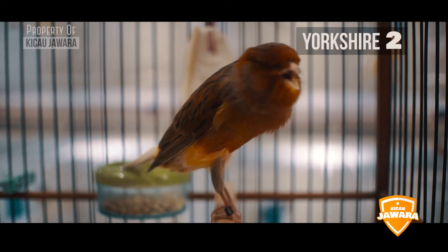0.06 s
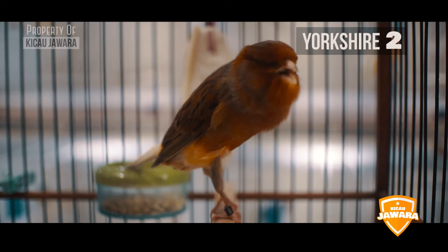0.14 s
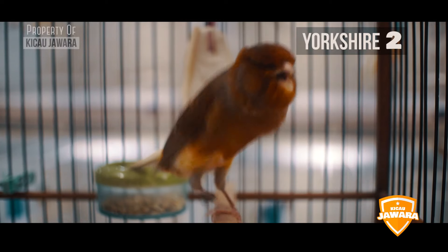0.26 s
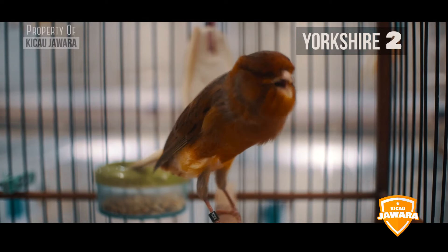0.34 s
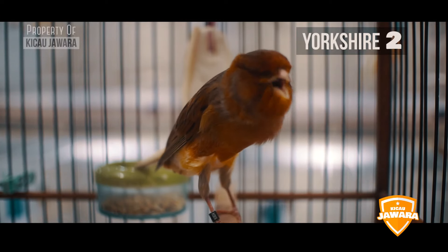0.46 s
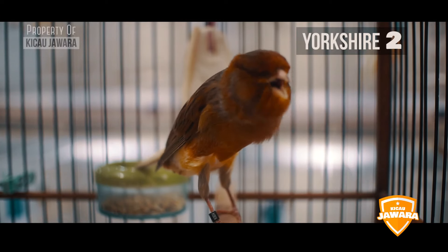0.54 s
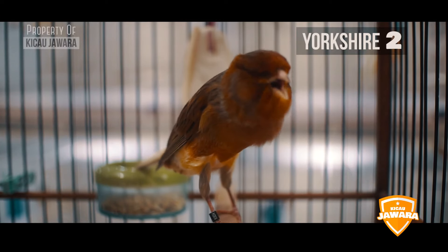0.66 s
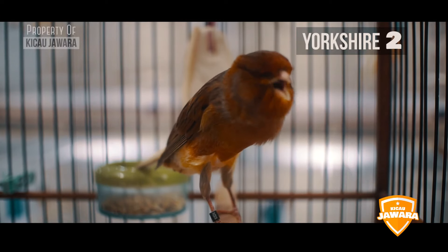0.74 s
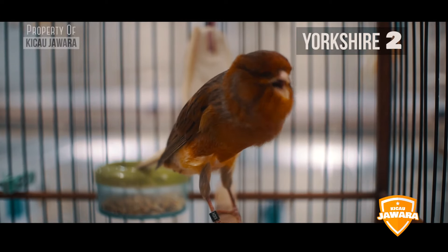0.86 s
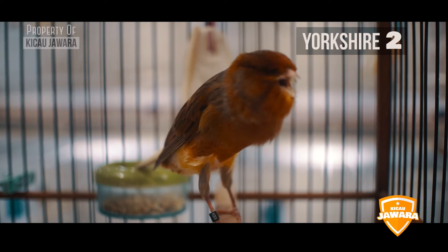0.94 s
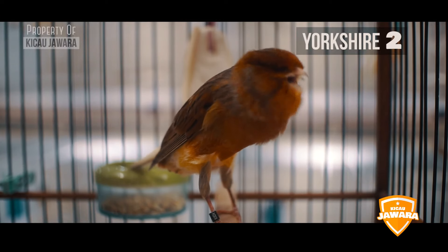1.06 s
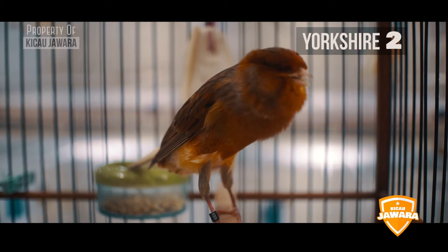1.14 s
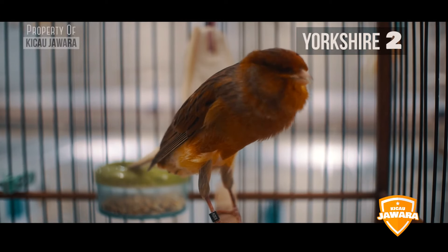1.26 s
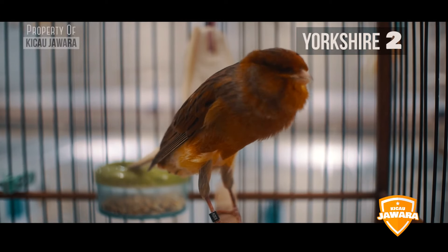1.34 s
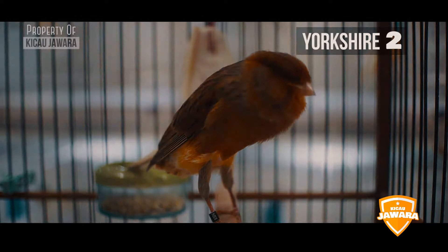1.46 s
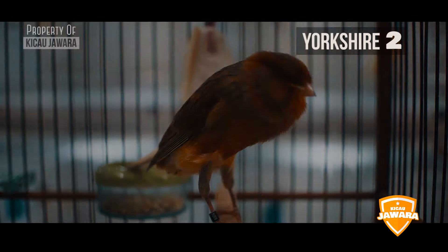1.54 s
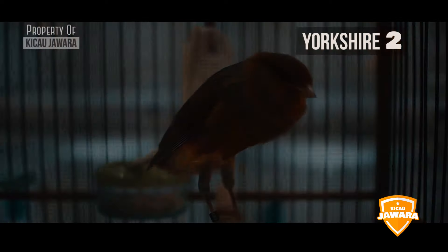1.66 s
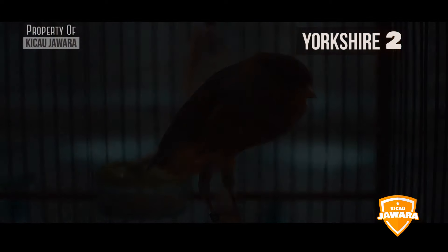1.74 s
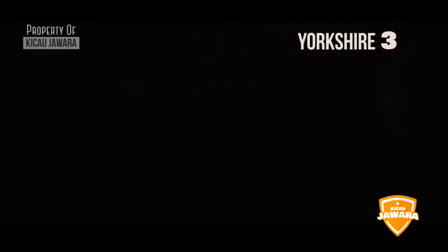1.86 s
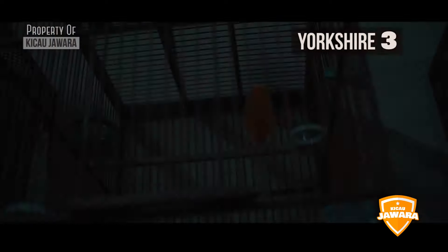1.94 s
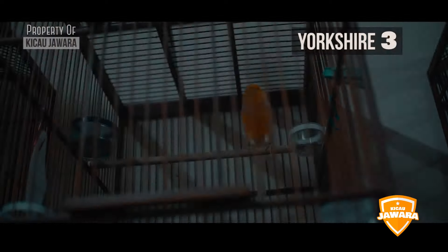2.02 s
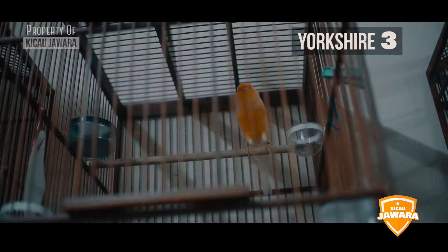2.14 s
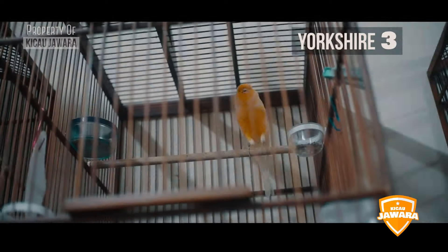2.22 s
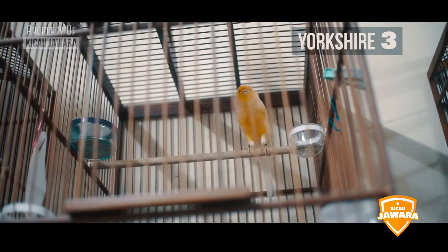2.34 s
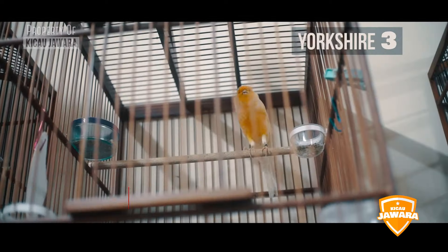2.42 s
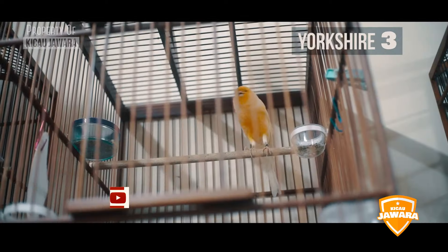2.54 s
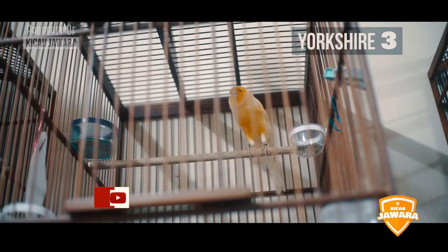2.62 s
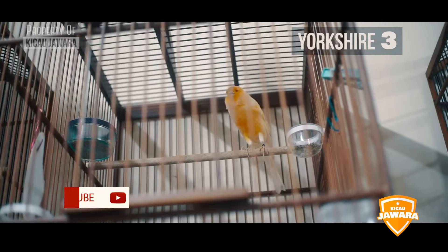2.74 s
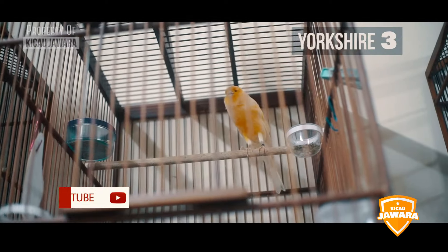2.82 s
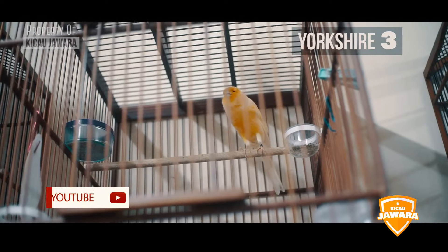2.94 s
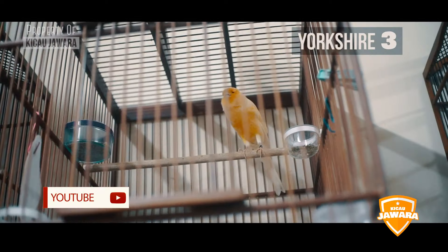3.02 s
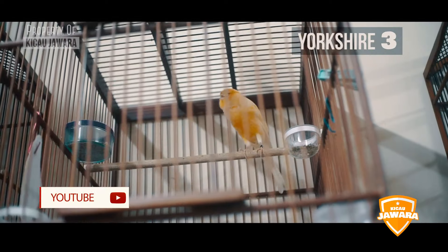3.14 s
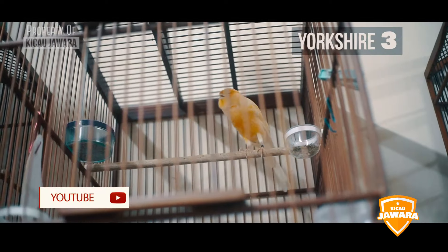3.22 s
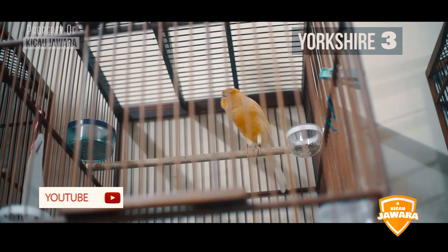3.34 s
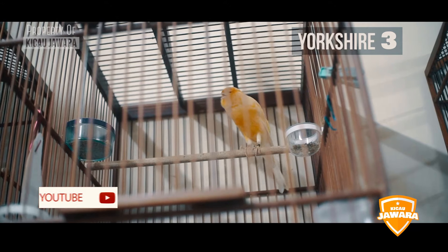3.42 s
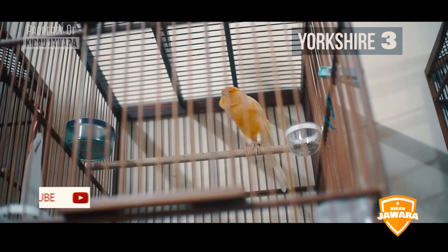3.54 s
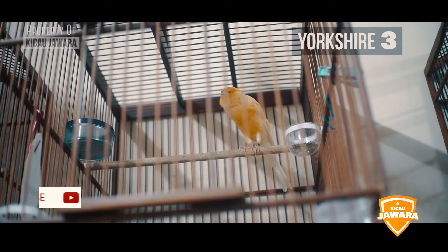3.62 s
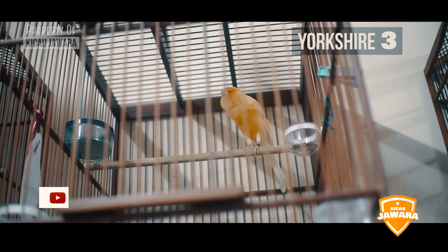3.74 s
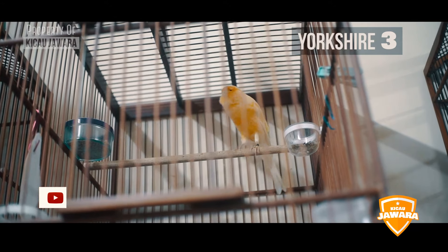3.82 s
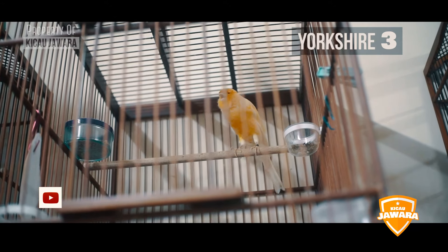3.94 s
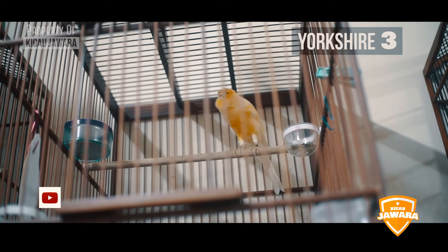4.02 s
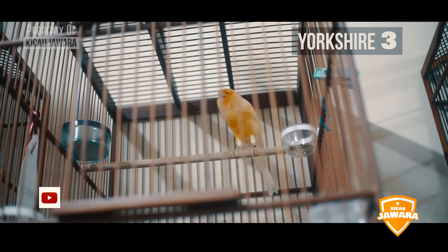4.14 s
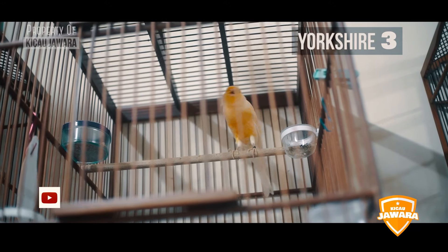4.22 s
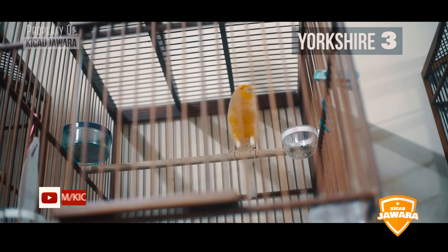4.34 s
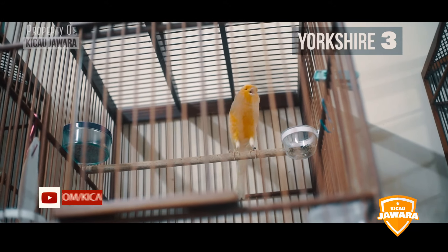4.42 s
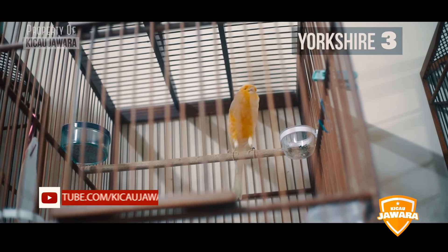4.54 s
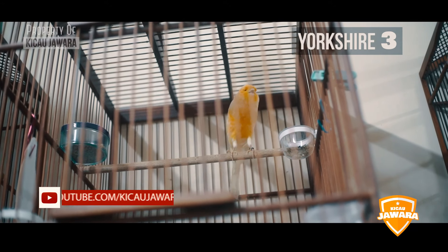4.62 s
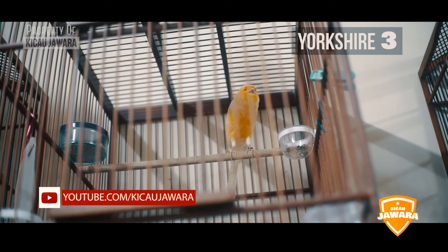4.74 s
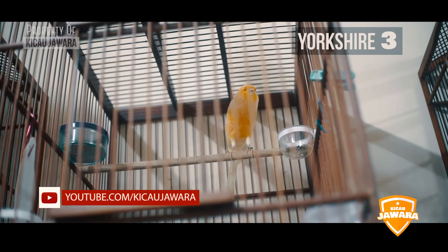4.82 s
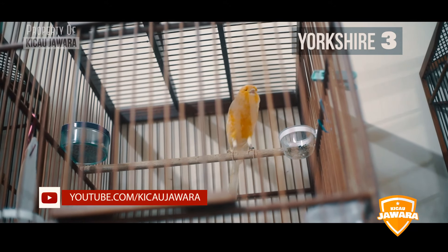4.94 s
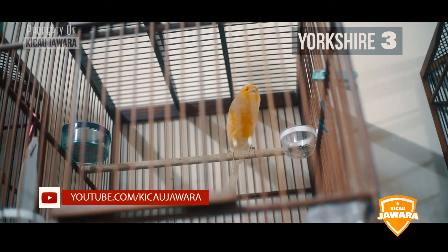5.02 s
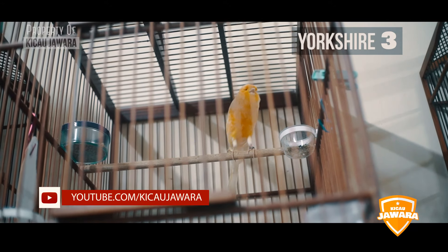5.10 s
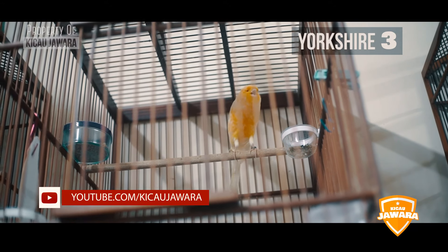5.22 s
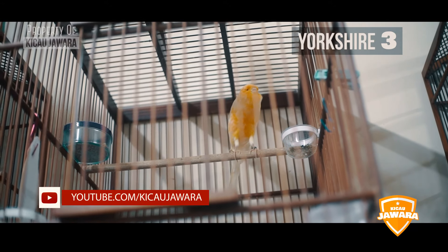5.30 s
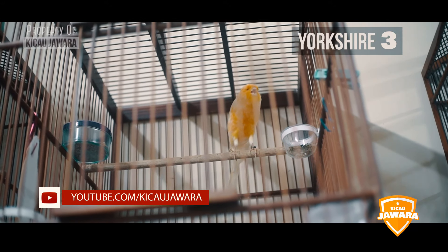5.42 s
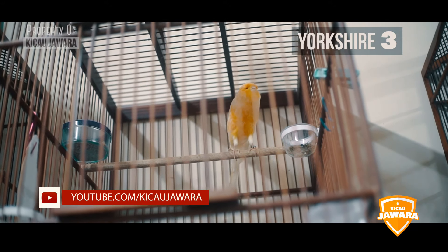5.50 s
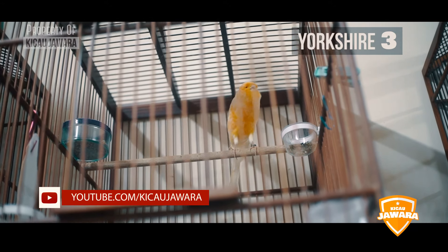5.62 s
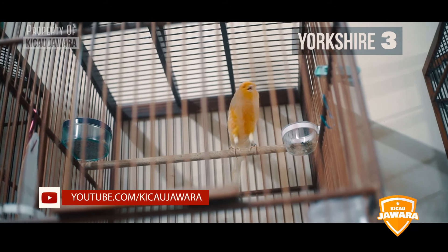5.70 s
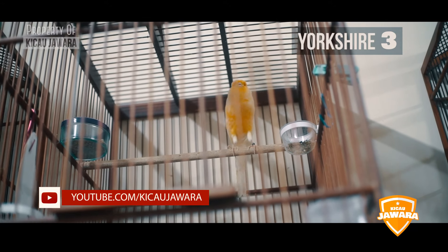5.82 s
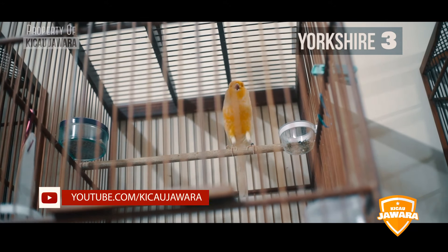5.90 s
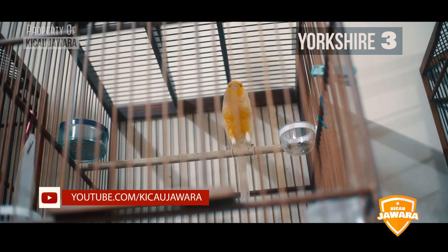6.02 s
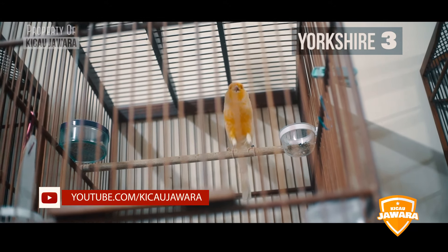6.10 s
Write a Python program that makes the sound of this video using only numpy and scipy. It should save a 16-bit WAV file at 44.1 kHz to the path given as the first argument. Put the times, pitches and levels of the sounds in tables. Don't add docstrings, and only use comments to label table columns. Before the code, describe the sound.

Indoor canary song: an even trill of piercing down-swept whistles, a short gap with distant birds, then rapid trilling, slow slides and bent slides.

```python
import sys
import numpy as np
from scipy import signal
from scipy.fft import rfft, irfft
from scipy.io import wavfile
from scipy.ndimage import uniform_filter1d, minimum_filter1d

SR = 44100
rng = np.random.default_rng(int(sys.argv[2]) if len(sys.argv) > 2 else 0)


def magnitude_from_level(level_db):
    exponent = np.asarray(level_db, float) / 20
    return 10 ** exponent


def log_audio(samples):
    frames = np.atleast_2d(samples).T
    limited = np.clip(frames, -1, 1)
    pcm = np.round(limited * 32767).astype(np.int16)
    wavfile.write(sys.argv[1], SR, pcm)


N = 271656

# f/Hz, level/dB (per Hz)
RUMBLE_SPECTRUM = [(14, -11), (25, 2), (39, -7), (53, 5), (66, -0.5), (87, -16.5), (121, -4.5),
                   (200, -26.5)]
AIR_SPECTRUM = [(88, -40), (150, -3.5), (640, -14), (1520, -15.5), (1900, -22), (2770, -16), (3740, -14.5),
                (5820, -10), (6500, -38), (8450, -74), (14300, -120)]
HISS_SPECTRUM = [(6000, -8), (6800, 0), (10000, -1), (13000, -1), (15900, -4)]
# t/s, level/dB
RUMBLE_LEVEL = [(0, -52.5), (.6, -50.5), (1.3, -47.5), (2.15, -35.5), (2.9, -41), (3.6, -42), (4.7, -46.5),
                (5.05, -46.5), (5.5, -42), (6.16, -41.5)]
# t/s, level/dB
AIR_STIR = [(.8, 0.5), (2.62, 7), (2.85, 1)]
# f/Hz, level/dB
WHINE_TONES = [(9712, 0), (12950, 0)]
# t/s, peak level/dB
WHINE_LEVEL = [(0, -59), (2.1, -49.5), (2.5, -71), (6.16, -60)]
# start t/s, length t/s, first f/Hz, last f/Hz, peak level/dB
DISTANT_NOTES = [(1.32, .22, 5900, 5830, -50), (1.41, .08, 3200, 3220, -48), (1.448, .087, 3500, 4700, -36),
                 (1.48, .12, 5000, 6050, -47), (1.665, .055, 4100, 4700, -42),
                 (1.685, .16, 4700, 6000, -42), (1.52, .2, 2620, 2530, -49), (1.515, .02, 2000, 2040, -47),
                 (1.62, .025, 1930, 2000, -48), (1.925, .11, 4250, 4330, -39), (3.21, .03, 2060, 1950, -51),
                 (3.425, .025, 2290, 2180, -48), (1.9, .05, 6400, 6250, -45), (1.93, .19, 2780, 2790, -44),
                 (1.93, .17, 2155, 2150, -52), (2.81, .06, 2170, 1890, -52), (3.16, .025, 2250, 2200, -50)]
# start t/s, length t/s, peak level/dB
FAR_NOTES = [(1.53, 0.11, -32.5), (1.715, 0.14, -28), (1.93, .125, -23), (2.145, 0.14, -24.5)]
# share of length, f/Hz, level/dB
FAR_ARCH = [(0, 3150, -5), (.23, 3255, 0), (.6, 3325, -.5), (.88, 3230, -4), (1, 3170, -12)]
# start t/s, length t/s, first f/Hz, last f/Hz, peak level/dB
THROBS = [
    (4.135, .12, 3400, 4040, -16),
    (4.228, .36, 3730, 3600, -19),
]
# t/s, peak level/dB
FLAPS = [
    (2.342, -37),
    (2.497, -30.5),
    (2.543, -31.5),
    (2.599, -38),
    (2.643, -37),
    (2.709, -44),
]
# start t/s, length to the knee t/s, top shift f/Hz, middle shift f/Hz, level/dB
TRILL = [(.2335, .0643, 97, 255, 0), (.3322, .0579, -8, -30, .1), (.423, .0589, -10, 30, .3),
         (.5168, .0569, -53, -28, 0), (.6096, .0599, 20, 100, -.5), (.7044, .0564, 9, 155, 0),
         (.7992, .0584, -20, 55, -.2), (.894, .0558, -28, -37, .2), (.9888, .0613, -114, -122, -.5)]
TRILL_ENDS = [
    (.1167, .0624, 122, 340, .2),
    (1.0945, .0544, -148, -340, -.2),
]
FAST_TRILL = [(2.1052, .0379, -281, 155, -5.6), (2.184, .0409, 2, 265, -2.6), (2.2718, .0389, -79, 75, -.5),
              (2.3556, .0365, 4, 115, 0), (2.4385, .0379, -13, 30, .2), (2.5213, .0379, -5, 38, .7),
              (2.6061, .0389, 3, 68, 0), (2.6909, .0394, 80, 28, .2), (2.7777, .0389, 57, -2, .7),
              (2.8655, .0399, 49, -75, .7), (2.9503, .0399, 36, -14, .3), (3.0371, .0399, 3, -27, -.3),
              (3.1289, .0414, -59, -210, .5), (3.2167, .0419, 59, -37, -.6), (3.3075, .0409, -2, -60, -.5),
              (3.4003, .0434, 13, -88, -.6)]
FIRST_SLIDE = [
    (3.498, .147, 0, 0, 0),
]
SLIDES = [(3.7195, .1596, 72, 56, .5), (3.955, .1611, 109, 60, .2), (4.1915, .1736, 83, -98, 0),
          (4.4469, .1786, -80, -130, -.7), (4.7103, .1325, -24, 175, -2.2), (4.9178, .1245, -21, 160, -1.8)]
BENT_SLIDES = [(5.1144, .0973, 4, 8, -1.1), (5.277, .0968, 50, 30, .2), (5.4476, .0968, -38, -20, -.3),
               (5.6192, .0918, -19, -63, -.2), (5.7829, .0967, -22, -4, .3), (5.9545, .0982, 53, 4, .9),
               (6.126, .097, 22, -8, .5)]
# share of length, f/Hz
TRILL_SHAPE = [(0, 6800), (.1, 6860), (.33, 6130), (.67, 4850), (1, 3500), (1.14, 2700)]
ENDS_SHAPE = [(0, 6800), (.1, 6800), (.33, 6150), (.67, 5030), (.9, 4200), (1, 4000), (1.13, 3800)]
FAST_SHAPE = [(0, 6080), (.12, 6060), (.33, 5440), (.67, 4570), (.92, 4060), (1, 3800), (1.12, 3100)]
FIRST_SHAPE = [(0, 6420), (.08, 6250), (.13, 5900), (.29, 5820), (.56, 5050), (.83, 3900), (.97, 3350),
               (1, 3000), (1.055, 900)]
SLIDE_SHAPE = [(0, 6520), (.07, 6520), (.33, 5770), (.67, 4690), (.955, 3640), (1.02, 3200), (1.065, 900)]
BENT_SHAPE = [(0, 6370), (.17, 6040), (.42, 4960), (.54, 4080), (.75, 3650), (.92, 3100), (1, 2700),
              (1.145, 500)]
# f/Hz, peak level/dB
TRILL_THROAT = [(2700, -68), (3200, -29.5), (3600, -14.5), (4000, -5.5), (4600, -3.5), (5100, -6),
                (5500, -13.5), (5900, -25), (6300, -11.5), (6700, -13), (7000, -9.5)]
FAST_THROAT = [(3100, -19), (3700, -10.5), (4150, -5.5), (4500, -8.5), (5200, -17.5), (5700, -15.5),
               (6000, -12), (6200, -16.5)]
SLIDE_THROAT = [(1150, -21.5), (1600, -29), (2400, -24.5), (3200, -8), (3700, -8), (4300, -5), (5000, -11),
                (5600, -13), (6000, -7.5), (6300, -14.5), (6600, -8)]
BENT_THROAT = [(900, -40), (1800, -25.5), (2600, -11.5), (3100, -9), (3700, -6.5), (4100, -14.5),
               (4700, -8), (5400, -16.5), (5900, -14.5), (6300, -8.5)]
# t/s, f/Hz, peak level/dB
NEAR_NOTES = [
    [(0, 4640, 4), (.02, 3950, -6.5), (.035, 3520, -13), (.041, 3250, -19), (.052, 2844, -10.5),
     (.057, 2660, -20), (.063, 1296, -34)],
    [(1.16, 3450, -56), (1.168, 3195, -21.5), (1.176, 2670, -10.5), (1.182, 2000, -33), (1.189, 1320, -26)],
]
LIVE_NOTES = [
    [(2.042, 4830, -39), (2.048, 4490, -13), (2.056, 3700, -24)],
]

AIR_DB, AIR_FOLLOWS = -50.5, 0.23
HISS_FIRST_DB, HISS_SECOND_DB, CHANGE_S = -66, -51, (0.8, 2.12)
MAINS_HZ, WHINE_START_S = 50, .0085
GLIDE_SHARE, DISTANT_FADE_DB = .15, 9
THROB_HZ, THROB_PEAK_S, THROB_DB, EVERY_OTHER_DB, THROB_FADE_DB = 26.7, 4.242, 8, 3, 8
THIRD_FADES_HZ, THIRD_FADE_DB_PER_KHZ = 4870, 8
DROP_DB, DROP_TIRES_DB_PER_S = 7, 7
STARVED_HZ, MASKER_HZ, BINS_PER_BAND = 6890, 4400, 14
MASK_DB = 47


def rms_one(x):
    return x / np.sqrt(np.mean(x ** 2) + 1e-20)


def at_hz(points, hz):
    curve_hz, curve_db = np.array(points)[:, 0], np.array(points)[:, 1]
    return np.interp(np.log(hz), np.log(curve_hz), curve_db)


def drift(rate, size):
    r = np.exp(-2 * np.pi * rate / SR)
    wander = signal.lfilter([1], [1, -2 * r, r * r], rng.standard_normal(size + 4000))
    return rms_one(wander[4000:])


def noise(spectrum, side_db):
    hz = np.fft.rfftfreq(N, 1 / SR) + 1e-3
    colour = magnitude_from_level(at_hz(spectrum, hz)) * (hz > spectrum[0][0]) * (hz < spectrum[-1][0])
    mid, side = irfft(rfft(rng.standard_normal((2, N))) * colour, N)
    return rms_one(mid + magnitude_from_level(side_db) * side * [[1], [-1]])


def background():
    t = np.arange(N) / SR
    rumble_db = np.interp(t, *np.transpose(RUMBLE_LEVEL))
    swing_db = AIR_FOLLOWS * (rumble_db - rumble_db.mean())
    air_db = AIR_DB + swing_db + np.interp(t, *np.transpose(AIR_STIR))
    hiss_db = np.interp(t, CHANGE_S, [HISS_FIRST_DB, HISS_SECOND_DB])
    rumble = magnitude_from_level(rumble_db) * noise(RUMBLE_SPECTRUM, side_db=-13.5) * magnitude_from_level([[1.1], [-1.1]])
    air = magnitude_from_level(air_db) * noise(AIR_SPECTRUM, side_db=-18)
    hiss = magnitude_from_level(hiss_db) * noise(HISS_SPECTRUM, side_db=-3.0)
    return rumble + air + hiss


def whine():
    t = np.arange(N) / SR
    on = uniform_filter1d(((t - WHINE_START_S) * MAINS_HZ % 1 < .5) * 1., size=30)
    on *= magnitude_from_level(np.interp(t, *np.transpose(WHINE_LEVEL)))
    return on * sum(magnitude_from_level(db) * np.sin(2 * np.pi * hz * t) for hz, db in WHINE_TONES)


def room(x, direct_db, early_db, early_t60, late_db, late_t60, side_db, dull_hz):
    t = np.arange(SR) / SR
    grain = rng.standard_normal((2, 2, SR))
    sparse = grain[0] * (rng.random(SR) < .03) * magnitude_from_level(-60 * t / early_t60) * (t > .0015)
    tail = grain[1] * magnitude_from_level(-60 * t / late_t60) * np.clip(t / 0.017, 0, 1)
    echoes = magnitude_from_level(early_db) * sparse / np.linalg.norm(sparse[0]) + magnitude_from_level(late_db) * tail / np.linalg.norm(tail[0])
    mid, side = signal.sosfilt(signal.butter(2, dull_hz, fs=SR, output="sos"), echoes)
    response = mid + magnitude_from_level(side_db) * side * [[1], [-1]]
    return magnitude_from_level(direct_db) * x + signal.fftconvolve(x[None], response)[:, :N]


def add_whistle(out, start, hz, db, second_db, third_db, edge_s):
    phase = 2 * np.pi * (np.cumsum(hz) / SR + rng.random())
    t = np.arange(len(hz)) / SR
    since_start = t + (start == 0)
    gate = np.clip(np.minimum(since_start, t[::-1]) / edge_s, 0, 1) ** 2
    high_db = THIRD_FADE_DB_PER_KHZ * np.maximum(hz - THIRD_FADES_HZ, 0) / 1000
    over = magnitude_from_level(second_db + 3.76 * drift(136, size=len(t))) * np.sin(2 * phase)
    over += magnitude_from_level(third_db + 3.8 * drift(140, size=len(t)) - high_db) * np.sin(3 * phase) * (hz < SR / 7)
    over *= magnitude_from_level(-.4 * np.clip(db + 4.5, -18, 0))
    voice = gate * magnitude_from_level(db) * np.array([np.sin(phase), over])
    out[:, start:start + len(hz)] += voice[:, :N - start]


def whistles(tables, second_db, third_db, waver_db):
    out = np.zeros((2, N))
    for s, hz, db in map(np.transpose, tables):
        t = np.arange(s[0], s[-1], 1 / SR)
        level_db = np.interp(t, s, db) + waver_db * drift(58, size=len(t))
        add_whistle(out, round(s[0] * SR), np.interp(t, s, hz), level_db, second_db, third_db, edge_s=0.0035)
    return out


def glides(notes, settle, fade_db):
    along = np.linspace(0, 1, 12)
    curves = []
    for s, length, first, last, db in notes:
        hz = last + (first - last) * np.exp(-along / settle)
        curves.append(np.transpose([s + along * length, hz, db - fade_db * along]))
    return curves


def distant_birds():
    curves = glides(DISTANT_NOTES, GLIDE_SHARE, DISTANT_FADE_DB)
    return whistles(curves, second_db=-42, third_db=-51, waver_db=5)[0]


def far_bird():
    curves = [[(s + share * length, hz, db + shape_db) for share, hz, shape_db in FAR_ARCH]
              for s, length, db in FAR_NOTES]
    return whistles(curves, second_db=-50, third_db=-35, waver_db=1.5)[0]


def throbbing_neighbour():
    turn = np.pi * THROB_HZ * (np.arange(N) / SR - THROB_PEAK_S)
    throb = magnitude_from_level(THROB_DB * np.cos(2 * turn) + EVERY_OTHER_DB * np.cos(turn) - 3.5)
    curves = glides(THROBS, settle=.13, fade_db=THROB_FADE_DB)
    return (throb * whistles(curves, second_db=-44, third_db=-60, waver_db=1.5)).sum(0)


def wings():
    t, puffs = np.arange(N) / SR, np.zeros(N)
    for s, db in FLAPS:
        puffs += magnitude_from_level(db - 2.5) * (t > s) * np.exp(-np.abs(t - s) / 0.016)
    band = signal.butter(1, [250, 1800], "band", fs=SR, output="sos")
    return puffs * rms_one(signal.sosfilt(band, rng.standard_normal(N)))


def phrase(notes, shape, throat, second_db, third_db, drop_db=0, tires_db=0):
    out = np.zeros((2, N))
    share, shape_hz = np.transpose(shape)
    for s, length, top_hz, middle_hz, db in notes:
        along = np.arange(int(share[-1] * length * SR)) / (length * SR)
        bend = np.interp(along, [1 / 12, 1 / 3, 2 / 3, 1], [top_hz, middle_hz, middle_hz, 0])
        hz = uniform_filter1d(np.interp(along, share, shape_hz) + bend, size=100, mode="nearest")
        closing_db = drop_db - tires_db * (s - notes[0][0])
        db = db + closing_db * np.clip((along - 1.02) / .02, 0, 1)
        add_whistle(out, round(s * SR), hz, db + at_hz(throat, hz), second_db, third_db, edge_s=0.0045)
    return out


def near_bird():
    song = phrase(TRILL, TRILL_SHAPE, TRILL_THROAT, second_db=-30.0, third_db=-29.5)
    song += phrase(TRILL_ENDS, ENDS_SHAPE, TRILL_THROAT, second_db=-29.5, third_db=-35.5)
    return song + whistles(NEAR_NOTES, second_db=-35.5, third_db=-35.0, waver_db=4.5)


def lively_bird():
    song = phrase(FAST_TRILL, FAST_SHAPE, FAST_THROAT, second_db=-29.5, third_db=-34)
    song += phrase(SLIDES, SLIDE_SHAPE, SLIDE_THROAT, -31.5, -36.0, DROP_DB, DROP_TIRES_DB_PER_S)
    song += phrase(FIRST_SLIDE, FIRST_SHAPE, SLIDE_THROAT, -34.5, -36.0, DROP_DB)
    song += phrase(BENT_SLIDES, BENT_SHAPE, BENT_THROAT, second_db=-31, third_db=-32.5)
    return song + whistles(LIVE_NOTES, second_db=-34, third_db=-41, waver_db=1.5)


def scene():
    near, live = near_bird(), lively_bird()
    beyond = far_bird() + throbbing_neighbour()
    birds = room(distant_birds(), -4, early_db=-3, early_t60=.12, late_db=-5, late_t60=.7,
                 side_db=-6, dull_hz=7000)
    birds += room(beyond, 0, early_db=-11, early_t60=0.026, late_db=-5.5, late_t60=0.5,
                  side_db=-7.5, dull_hz=7100)
    birds += room(near[0], 0, early_db=-14.5, early_t60=0.03, late_db=-16.5, late_t60=0.65,
                  side_db=-5.0, dull_hz=7240)
    birds += room(live[0] + wings(), 0, early_db=-3.5, early_t60=0.031, late_db=-7.5, late_t60=0.62,
                  side_db=-8.0, dull_hz=6530)
    birds += room(near[1] + live[1], 0, early_db=-5, early_t60=.05, late_db=-12, late_t60=.25,
                  side_db=-4, dull_hz=14000)
    return background() + whine() + birds * magnitude_from_level([[-.65], [.65]])


def limiter(x, ceiling_db, release_db_s):
    slope = release_db_s * np.arange(N) / SR
    over = np.maximum(20 * np.log10(np.abs(x).max(0) + 1e-9) - ceiling_db, 0)
    held = np.maximum.accumulate(over + slope) - slope
    return x * magnitude_from_level(-uniform_filter1d(-minimum_filter1d(-held, size=88), size=44))


def starve(x):
    hz, _, cells = signal.stft(x, SR, nperseg=1024)
    power = (np.abs(cells) ** 2).sum(0)
    first = np.searchsorted(hz, STARVED_HZ)
    masker = power[np.searchsorted(hz, MASKER_HZ):first].sum(0)
    for low in range(first, len(hz), BINS_PER_BAND):
        band = slice(low, low + BINS_PER_BAND)
        cells[:, band] *= power[band].sum(0) > masker * magnitude_from_level(-2 * MASK_DB)
    return signal.istft(cells, SR)[1][:, :N]


def low_pass(x):
    return signal.sosfilt(signal.butter(12, 15900, fs=SR, output="sos"), x)


def record(dry):
    held = limiter(dry, ceiling_db=-1.3, release_db_s=300)
    mix = starve(held)
    return low_pass(mix)


dry = scene()
out = record(dry)
log_audio(out)
```